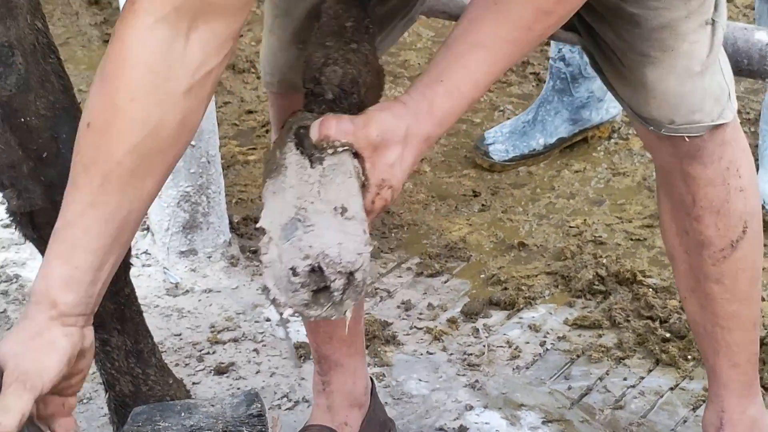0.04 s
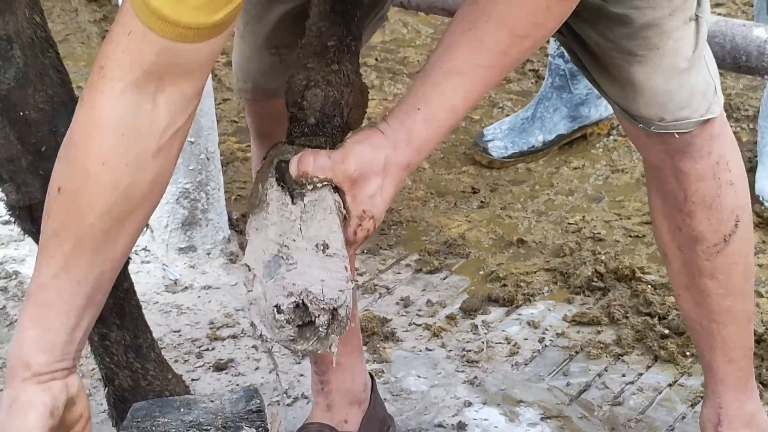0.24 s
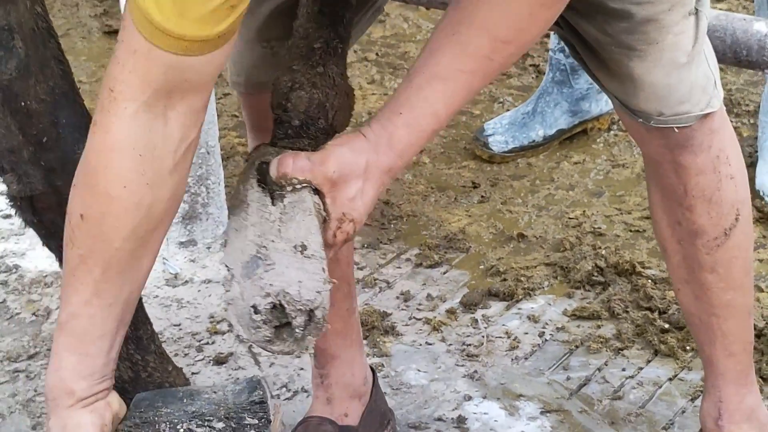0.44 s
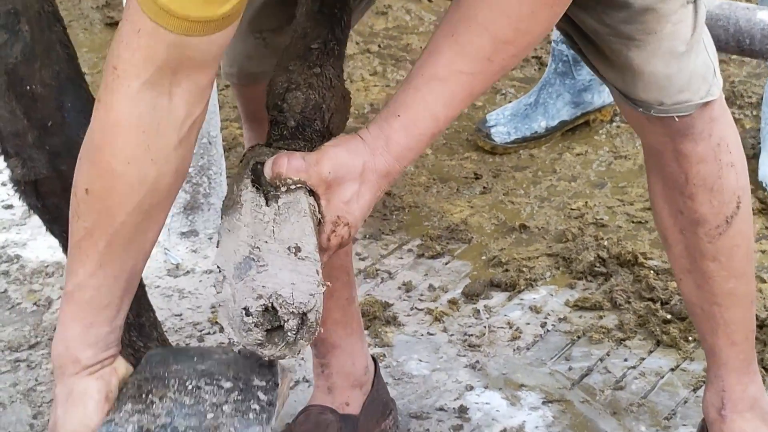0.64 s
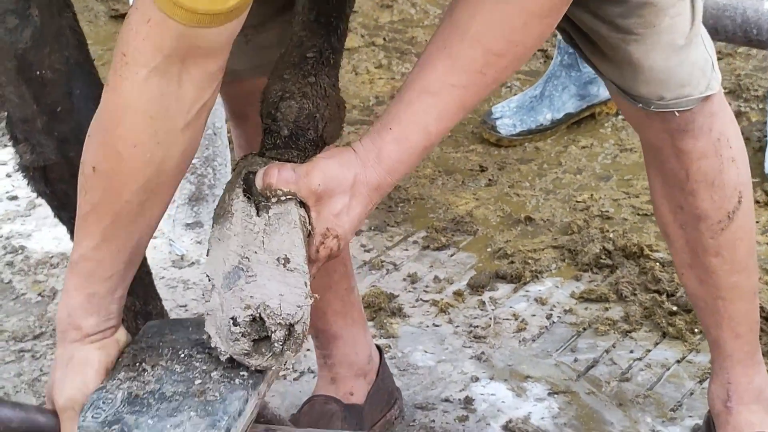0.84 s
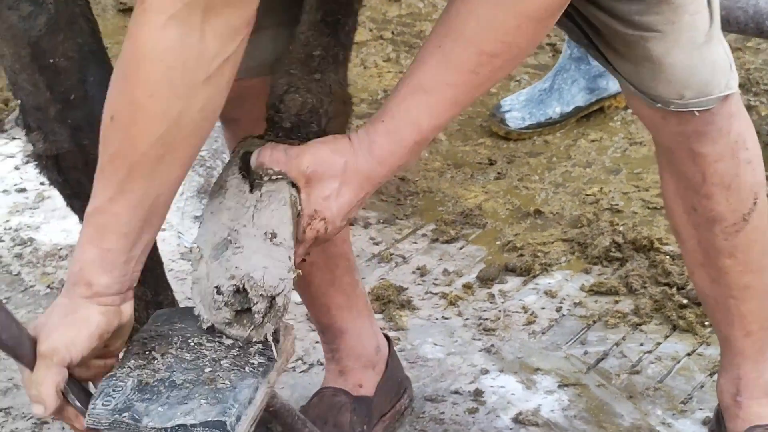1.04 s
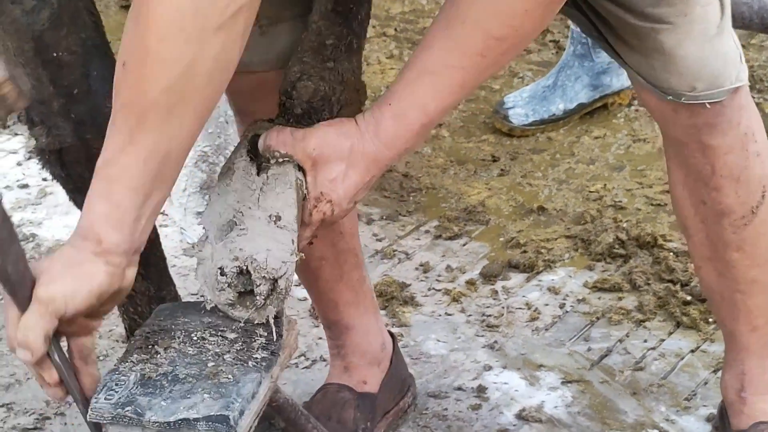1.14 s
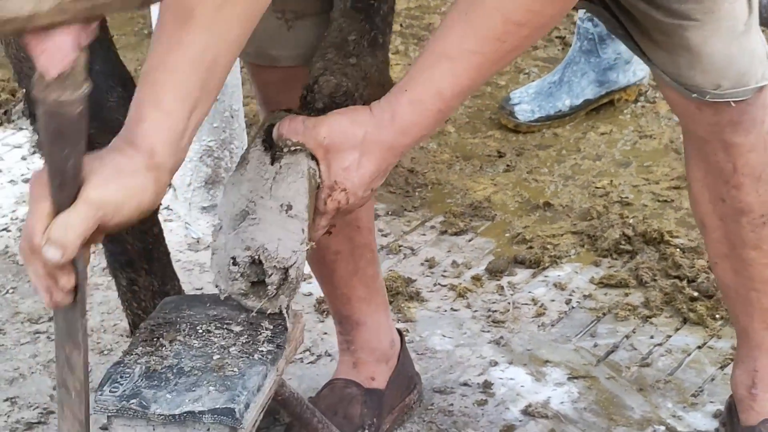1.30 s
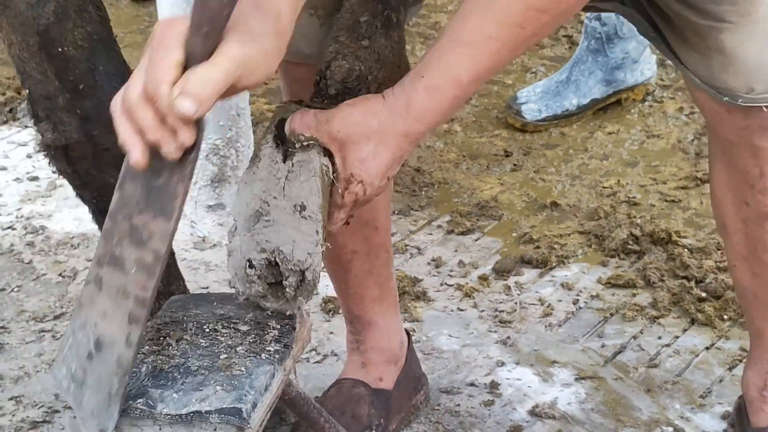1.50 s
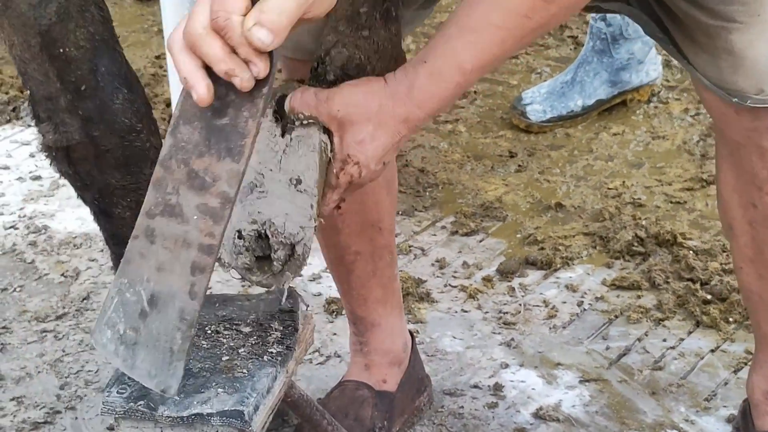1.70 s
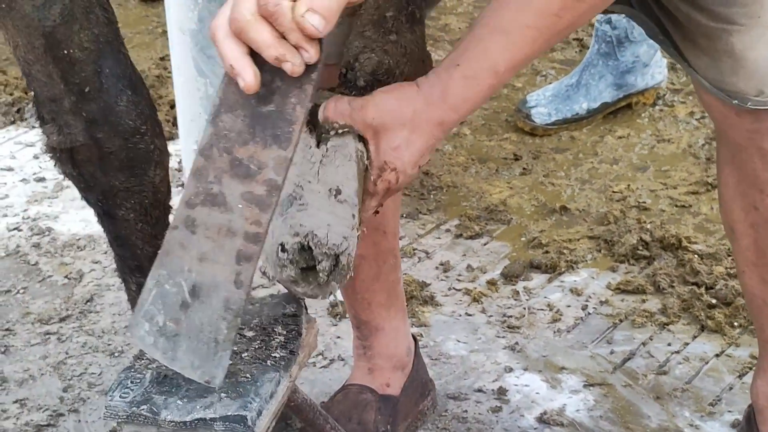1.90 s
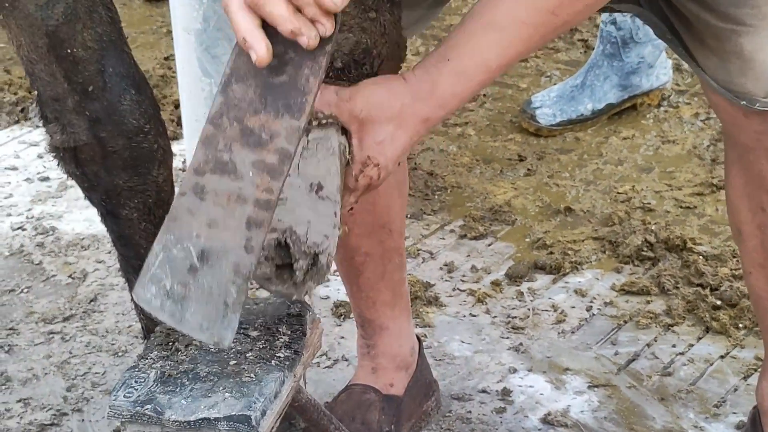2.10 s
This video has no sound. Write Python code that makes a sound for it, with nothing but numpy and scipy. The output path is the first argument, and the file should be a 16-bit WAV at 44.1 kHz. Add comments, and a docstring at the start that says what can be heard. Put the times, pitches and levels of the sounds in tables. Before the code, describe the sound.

A heavy steel blade knocks and scrapes on a gritty barn floor, an iron hoof stand drags briefly, then more clinks and scraping as the blade is lifted; close phone stereo over low hum.

```python
"""Barn air and a wavering low hum run throughout. A heavy steel blade on the barn floor is knocked and scraped
over grit, both ringing its modes; a gritty rasp, noise through a jumping resonance, comes and goes.
Low groans are narrow noise under smooth arches. The blade is gradually lifted by hand, and an iron
hoof stand is dragged closer, grit ringing its modes. A short barn tail follows the metal sounds,
and a phone's two microphones colour it all."""
import sys
import numpy as np
from scipy import signal
from scipy.fft import rfft, irfft, next_fast_len
from scipy.io import wavfile
from scipy.ndimage import uniform_filter1d

SR = 44100
rng = np.random.default_rng(int(sys.argv[2]) if len(sys.argv) > 2 else 0)


def dump(signal):
    """Clip the signal to [-1, 1] and save it as 16-bit WAV at the path in sys.argv[1]."""
    limited = np.clip(np.atleast_2d(signal).T, -1, 1)
    pcm = np.round(limited * 32767).astype(np.int16)
    wavfile.write(sys.argv[1], SR, pcm)


N = 94815


def amp(db):
    """Turn decibels into linear gain."""
    return 10 ** (np.asarray(db) / 20)


def evened(x):
    """Scale a signal to an RMS of 1."""
    return x / np.sqrt(np.mean(x ** 2) + 1e-20)


def read(points, hz):
    """Read a curve of (f/Hz, value) points along a logarithmic frequency axis."""
    f, value = np.transpose(points)
    return np.interp(np.log(hz + 1), np.log(f + 1), value)


def random_curve(points):
    """A random line through evenly spaced normal draws, spanning the scene."""
    return np.interp(np.arange(N) / SR, np.linspace(0, N / SR, num=points), rng.standard_normal(size=points))


def levels(stroke):
    """Gains over time for every dB column of a stroke; silent outside it."""
    s, *columns = np.transpose(stroke)
    return amp([np.interp(np.arange(N) / SR, s, db, -np.inf, -np.inf) for db in columns])


def ring(x, hz, t60):
    """One decaying mode, a complex one-pole resonator; noise of power 1 comes out with power 1."""
    r = 1000 ** (-1 / (max(t60, .0003) * SR))
    pole = r * np.exp(2j * np.pi * hz / SR)
    return np.sqrt(2 * (1 - r * r)) * signal.lfilter([1], [1, -pole], x).imag


def ring_twice(x, hz, t60):
    """Two equal resonators in series: the mode swells before it decays, and its skirts are steeper."""
    return ring(ring(x, hz, t60), hz, t60)


def grit(per_s=5400):
    """Grains catching at random: sparse clicks of either sign and uneven size, at RMS 1."""
    size, chance, sign = rng.exponential(1, N), rng.random(N), rng.standard_normal(N)
    spread_db = 3 * np.minimum(size, 5)
    return evened(amp(spread_db) * sign * (chance < per_s / SR))


def air():
    """Barn air as random spectra with drifting patches, its two sides less alike towards the treble."""
    # spectrum of the air: f/Hz, relative level per Hz/dB
    spectrum = [(20, -4), (50, 0.5), (110, -9), (300, -15), (800, -28.5), (2200, -33.5), (4200, -28),
                (6500, -48.5), (15000, -48.5)]
    # likeness of left and right: f/Hz, likeness (0-1)
    likeness = [(100, 0.92), (400, 0.56), (10000, 0.043)]
    AIR_DB = -45
    frames, hz = N // 256 + 5, np.fft.rfftfreq(1024, 1 / SR)
    a, b, c, d, patches = rng.standard_normal((frames, 513, 5)).T
    # smooth the patches over frequency, then over time
    patches = evened(uniform_filter1d(uniform_filter1d(patches, 8, 0), 12, 1))
    same = np.clip(read(likeness, hz), -1, 1)[:, None]
    left, other = a + 1j * b, c + 1j * d
    right = same * left + np.sqrt(1 - same ** 2) * other
    frames_lr = np.array([left, right]) * amp(read(spectrum, hz)[:, None] + 0.5 * patches)
    sound = signal.istft(frames_lr, nperseg=1024, noverlap=768)[1][:, :N]
    return amp(AIR_DB) * evened(sound)


def hum():
    """A wavering low hum: noise through two narrow resonances in series at one pitch."""
    HUM_HZ, HUM_WIDTH_HZ, HUM_DB = 51.55, 20.8, -43.5
    narrow = ring(rng.standard_normal(N), HUM_HZ, 1.66 / HUM_WIDTH_HZ)
    return amp(HUM_DB) * evened(ring(narrow, HUM_HZ, 1.64 / HUM_WIDTH_HZ))


def knocks(hz, share, rattle, crunching):
    """Each knock is a tap and a burst of decaying rattle, driving modes near its two focus pitches hardest."""
    # knocks: t/s, level/dB, middle band against it/dB, top band against it/dB, extra on the crunch/dB,
    # first focus f/Hz, second focus f/Hz, rattle T60/s
    hits = [(0.218, -21.5, -2, -22, -6, 1420, 3580, 0.039), (.642, -12.5, 1, -5, 8.5, 1630, 2800, 0.022),
            (1.093, -20.5, -2, -20, -4.5, 1133, 3610, 0.068),
            (1.177, -16.5, -21, -26, 4.5, 1676, 2385, 0.065),
            (1.26, -22.5, -7, -11.5, 0, 1140, 2385, 0.093),
            (1.354, -20.5, -14.5, -30, 12, 1240, 1580, 0.043), (1.901, -61, 6.5, 9, 7, 3380, 5200, 0.17)]
    FOCUS_DB, FOCUS_OCTAVES = 9, 0.1
    TAP_DB, RISE_S = 6, 0.001315  # tap against rattle; the rattle's onset
    u, struck = np.arange(4000) / SR, np.zeros(N)
    for s, db, mid_db, top_db, crunch_db, *focus_hz, t60_s in hits:
        start = round(s * SR)
        at = slice(start, start + 4000)
        octaves_off = np.log2(hz / np.array(focus_hz))
        focus_db = FOCUS_DB * np.exp(-(octaves_off / FOCUS_OCTAVES) ** 2).max()
        level = db + crunch_db * crunching + share @ [0, mid_db, top_db] + focus_db
        decay = amp(level - 60 * u / max(t60_s, .002))
        struck[at] += rattle[at] * np.minimum(u / RISE_S, 1) * decay
        struck[start + round(RISE_S * SR)] += amp(level + TAP_DB)
    return struck


def blade():
    """Knocks ring the steel freely; scraping damps it, and the moving contact favours now one mode, now another."""
    # modes of the blade: f/Hz, level lying/dB, level held/dB
    blade_modes = [(1133, -12, -25.5), (1281, -8.5, -19), (1446, -13.5, -19.5), (1580, -15.5, -6),
                   (1665.4, -16, -12), (1911, -10.5, -19.5), (2385, -18.5, -10), (2767, -10.5, -72),
                   (2968, -16, -42), (3380, -15, -18), (3580, -12, -37), (3950, -18, -44),
                   (5200, -7.5, -43.5), (5800, -22, -44)]
    # broad crunch of the contact itself: f/Hz, level lying/dB, level held/dB
    crunch_modes = [(1110, -53, -24), (3340, -17, -23.5), (9600, -19.5, -36.5)]
    # centres of the low, middle and top band: f/Hz
    bands_hz = [1300, 3800, 9500]
    # scraping strokes: t/s, low band level/dB, middle band level/dB, top band level/dB
    scrapes = [
        [(.225, -87, -38.5, -53), (.295, -41.5, -42, -44), (.32, -54, -68, -93)],
        [(.484, -47, -58, -70), (.491, -60, -39, -47.5), (.54, -30, -44.5, -39), (.578, -82, -62, -66)],
        [(.65, -33.5, -48.5, -52), (.72, -34, -37, -35), (.76, -36.5, -45, -94), (.82, -59.5, -56, -60)],
        [(1.055, -55, -50, -46.5), (1.12, -35, -45.5, -31.5), (1.165, -37.5, -30, -23), (1.25, -39, -39.5, -65),
         (1.28, -30.5, -37, -40), (1.34, -54, -31, -74), (1.5, -50, -39, -57), (1.67, -49, -49.5, -60)],
    ]
    # how far the blade is off the floor: t/s, held (0-1)
    lift = [(.64, 0), (1.1, 0.25), (1.18, 0.43), (1.4, 0.8)]
    BLADE_T60_S, CRUNCH_T60_S = 0.05, 0.0017  # struck, at 1500 Hz per resonator; shorter above, longer below
    RUB_DAMPING = 0.89  # factor on T60 while scraped
    WANDER_DB, RADIATES_FROM_HZ = 5, 658
    t, rub, rattle, out = np.arange(N) / SR, grit(), rng.standard_normal(N), np.zeros(N)
    held = np.interp(t, *np.transpose(lift))
    bands = sum(levels(stroke) for stroke in scrapes)
    for modes, t60, passes in (blade_modes, BLADE_T60_S, 1), (crunch_modes, CRUNCH_T60_S, 2):
        for hz, lying_db, held_db in modes:
            share = np.array([np.interp(np.log(hz), np.log(bands_hz), row) for row in np.eye(3)])
            wander_db = WANDER_DB / passes * random_curve(50)
            rubbed = rub * (share @ bands) * amp(wander_db)
            struck = knocks(hz, share, rattle, passes - 1)
            rubbed *= amp(lying_db + (held_db - lying_db) * held)
            # a knock crunches alike, held or not
            struck *= amp(lying_db + (held_db - lying_db) * held * (passes == 1))
            mode_t60 = t60 * (1500 / hz) ** 0.52
            for _ in range(passes):
                rubbed = ring(rubbed, hz, RUB_DAMPING * mode_t60)
                struck = ring(struck, hz, mode_t60)
            out += rubbed + struck
    return signal.sosfilt(signal.butter(3, RADIATES_FROM_HZ, "high", fs=SR, output="sos"), out)


def rasp():
    """Grit through a steady resonance and one that jumps as the contact shifts, with dense crackle above them."""
    # rasp strokes: t/s, pitch until the next row f/Hz, level/dB
    strokes = [
        [(.24, 3350, -69), (.3, 3210, -58.5), (.48, 3230, -57.5)],
        [(1.29, 3280, -46.5), (1.34, 3600, -47.5), (1.47, 3660, -66), (1.49, 3620, -46.5), (1.55, 3660, -55),
         (1.62, 3090, -52), (1.76, 3070, -63.5)],
    ]
    WIDTH_HZ, FLUTTER_DB = 120, 4
    UPPER_HZ, UPPER_DB = 4170, -6
    CRACKLE_PER_S, CRACKLE_HZ, CRACKLE_T60_S, CRACKLE_DB = 3000, 4610, .0012, -9  # T60 per resonator
    t, (s, hz, _) = np.arange(N) / SR, np.transpose(sum(strokes, []))
    level = sum(levels(np.delete(stroke, 1, axis=1))[0] for stroke in strokes)
    pitch = hz[np.maximum(np.searchsorted(s, t) - 1, 0)]
    low = signal.butter(1, WIDTH_HZ / 2, fs=SR, output="sos")
    out = amp(CRACKLE_DB) * ring_twice(grit(CRACKLE_PER_S), CRACKLE_HZ, CRACKLE_T60_S)
    for centre, gain_db in (pitch, 0), (np.full(N, UPPER_HZ), UPPER_DB):
        # shift the centre down to 0 Hz, low-pass, and shift back: a resonance that can jump
        turn = np.exp(2j * np.pi * np.cumsum(centre) / SR)
        resonance = (turn * signal.sosfilt(low, grit() / turn)).real
        out += amp(gain_db + FLUTTER_DB * random_curve(80)) * evened(resonance)
    return out * level


def groans():
    """Low groans: noise narrowed by two resonances in series, swelling under a smooth arch."""
    # groans: start t/s, length t/s, centre f/Hz, width f/Hz, level at the arch's top/dB
    swells = [(0.454, 0.13, 125.7, 83, -33.5), (1.069, 0.21, 266, 402, -39.5)]
    out, noise, t = np.zeros(N), rng.standard_normal(N), np.arange(N) / SR
    for s, length, hz, width_hz, db in swells:
        arch = np.sin(np.pi * np.clip((t - s) / length, 0, 1))
        out += amp(db) * arch * evened(ring_twice(noise, hz, 2.2 / width_hz))
    return out


def stand():
    """Grit under the iron rings its narrow modes; a hard push shifts their balance and adds a scratch; hiss on top."""
    # modes of the hoof stand: f/Hz, level pushed gently/dB, level pushed hard/dB
    stand_modes = [(787, 0.5, -25), (788, -15, -3.5), (1256, 2, -4.5), (1417, -13, -4.5), (2092, -15, -7),
                   (2787, -14.5, -6.5), (4100, -22, -18.5)]
    # the drag across the floor: t/s, level/dB
    drag = [(.815, -85), (0.831, -42.5), (0.851, -59), (.87, -53), (0.957, -45.5), (0.988, -36.5),
            (0.998, -50), (1.05, -71)]
    T60_S, HARD_FROM_S = 0.023, 0.93  # T60 per resonator
    drive = grit() * levels(drag)[0]
    force = (np.arange(N) / SR >= HARD_FROM_S).astype(float)
    series_gain = np.sqrt(2 * np.log(1000) / (T60_S * SR))  # offsets the gain of the second resonator
    out = np.zeros(N)
    for hz, gentle_db, hard_db in stand_modes:
        pushed = drive * amp(gentle_db + (hard_db - gentle_db) * force)
        out += series_gain * ring_twice(pushed, hz, T60_S)
    scratch = amp(-4.5) * ring(ring(drive * force, 3300, 0.00081), 5600, 0.00037)
    hiss = amp(-18) * ring(drive, 8800, 0.00072)
    return out + scratch + hiss


def barn(x):
    """A short diffuse tail: decaying noise after a 3 ms gap, different at each microphone."""
    BARN_T60_S, BARN_DB = 0.1, -2.5
    t = np.arange(SR // 2) / SR
    tail = rng.standard_normal((2, len(t))) * amp(-60 * t / BARN_T60_S) * (t > .003)
    tail /= np.linalg.norm(tail[0])
    return amp(BARN_DB) * signal.fftconvolve(x[None], tail, axes=1)[:, :N]


def scene():
    """Centre the metal sounds, add their barn tail, and lay groans, air and hum under them."""
    near = blade() + rasp() + stand()
    return near + barn(near) + groans() + air() + hum()


def record(dry):
    """Two microphone ports share one colour and differ in level and phase; then the treble is cut off."""
    # level difference of the ports: f/Hz, left minus right/dB
    port_difference = [(2500, 0.5), (4200, 3.5), (6400, 13.5), (9000, -14.5), (15000, 6)]
    # phase difference of the ports: f/Hz, left leads by/rad
    phase_lead = [(300, 0), (5000, -.5), (9000, 1.5)]
    # colour of both microphones: f/Hz, level/dB
    colour = [(6500, -1), (8500, 3), (11300, -0.5), (12300, -4), (15000, -7.5)]
    EDGE_HZ = 15500
    size = next_fast_len(N + 4096)
    hz = np.fft.rfftfreq(size, 1 / SR)
    # each port takes half of the difference, in opposite directions
    half = amp(read(port_difference, hz) / 2) * np.exp(.5j * read(phase_lead, hz))
    response = amp(read(colour, hz)) * np.array([half, 1 / half])
    ports = irfft(rfft(dry, size) * response, size)[:, :N]
    low_pass = signal.firwin(1023, EDGE_HZ, window=("kaiser", 9), fs=SR)
    return signal.oaconvolve(ports, low_pass[None], "same")


dry = scene()
out = record(dry)
dump(out)
```